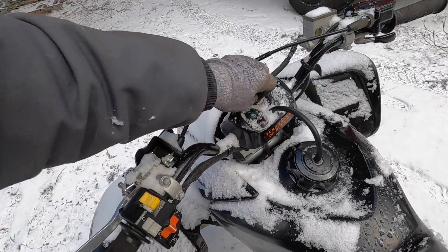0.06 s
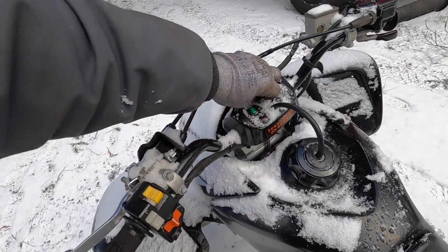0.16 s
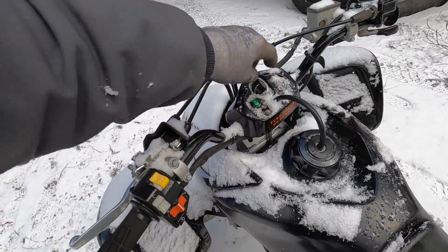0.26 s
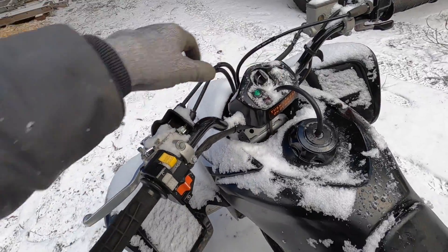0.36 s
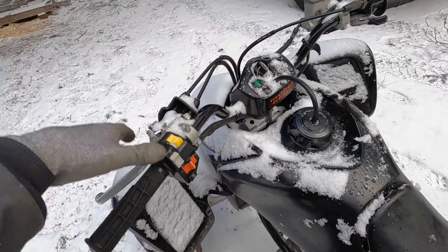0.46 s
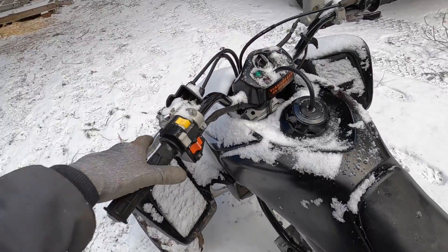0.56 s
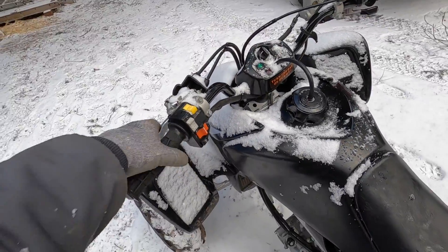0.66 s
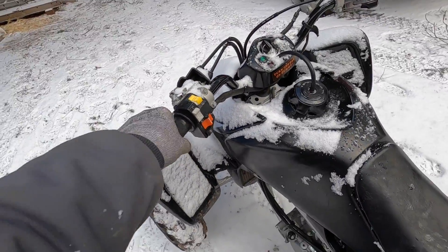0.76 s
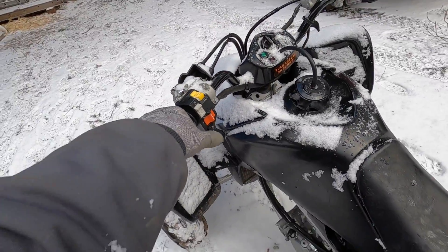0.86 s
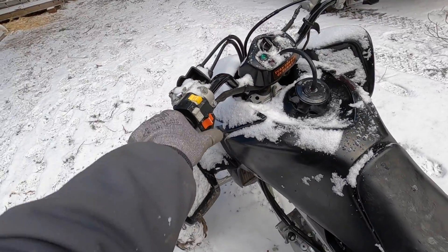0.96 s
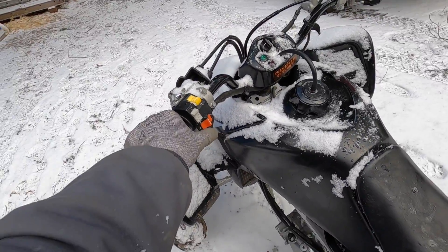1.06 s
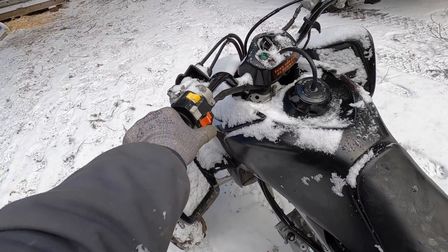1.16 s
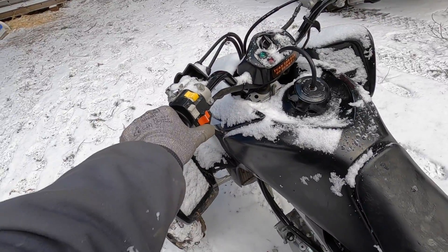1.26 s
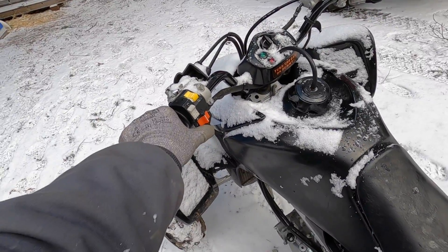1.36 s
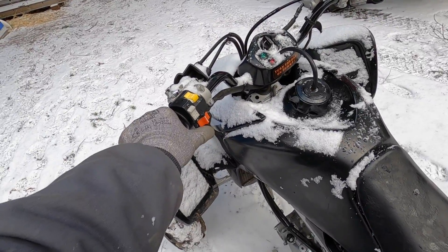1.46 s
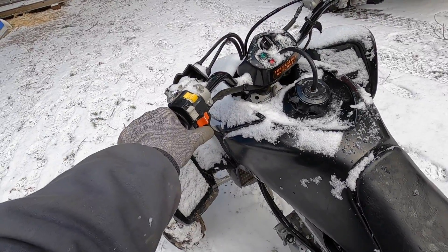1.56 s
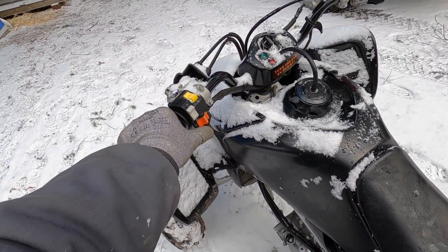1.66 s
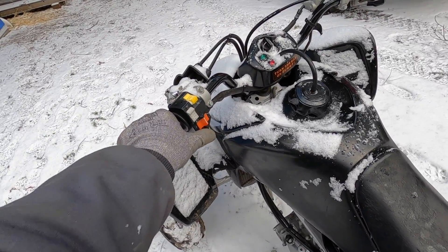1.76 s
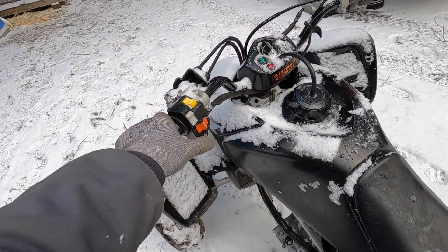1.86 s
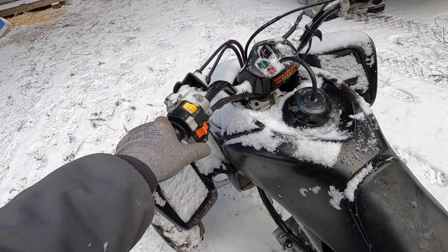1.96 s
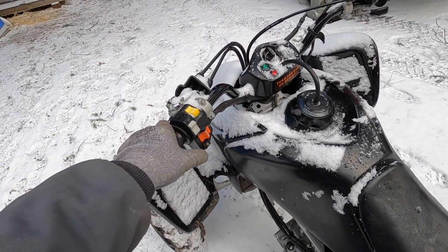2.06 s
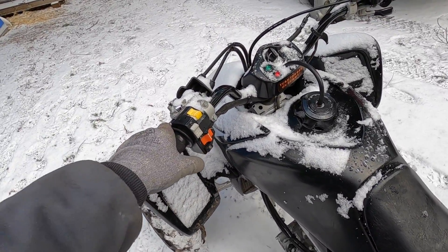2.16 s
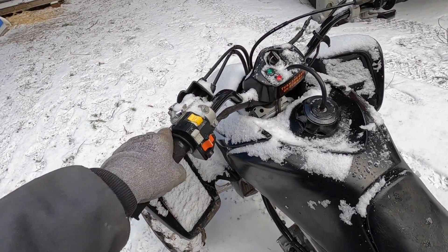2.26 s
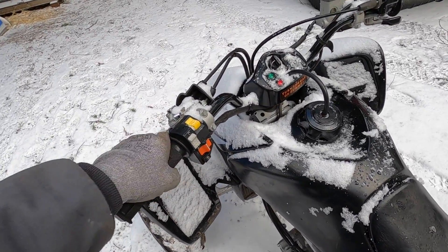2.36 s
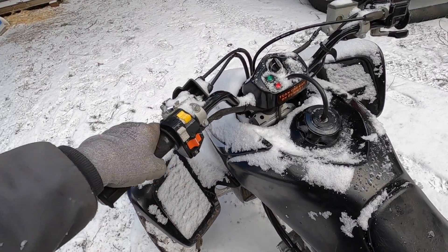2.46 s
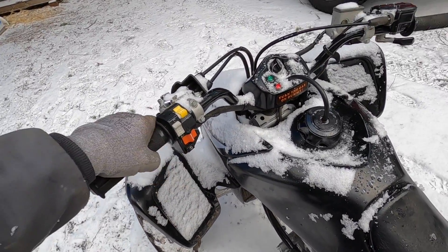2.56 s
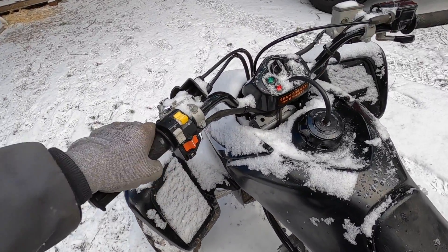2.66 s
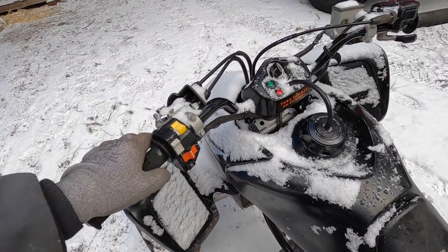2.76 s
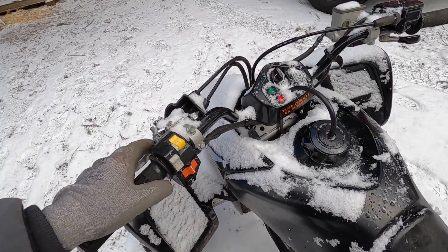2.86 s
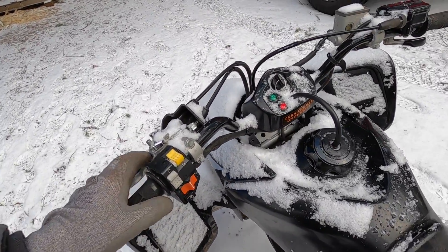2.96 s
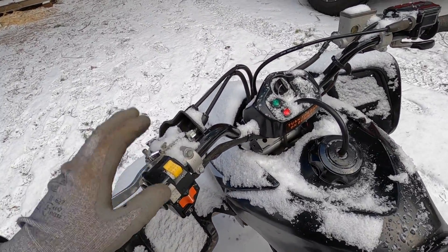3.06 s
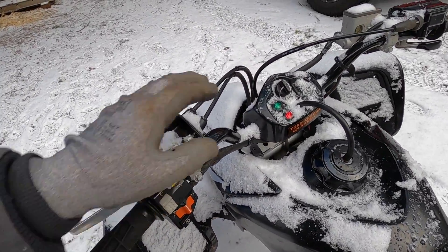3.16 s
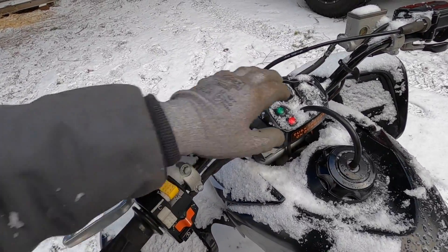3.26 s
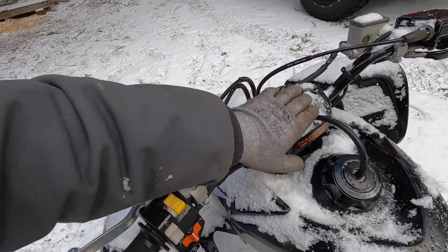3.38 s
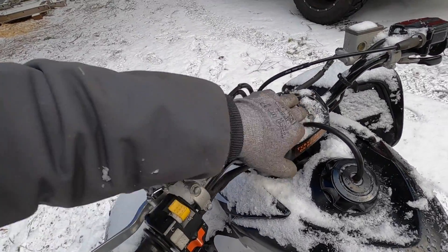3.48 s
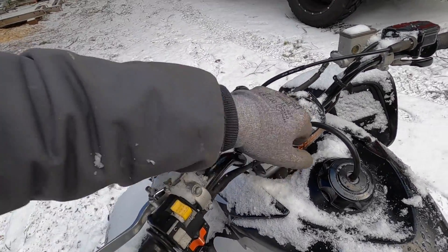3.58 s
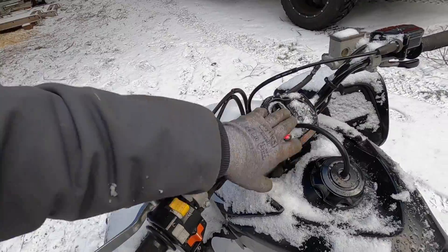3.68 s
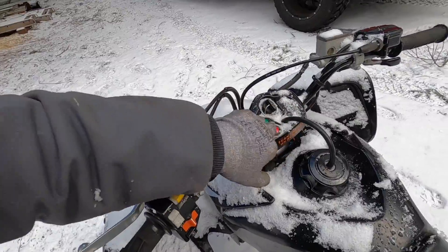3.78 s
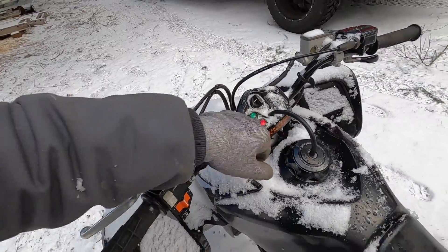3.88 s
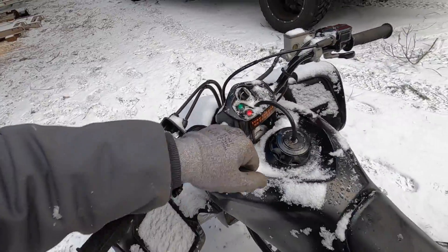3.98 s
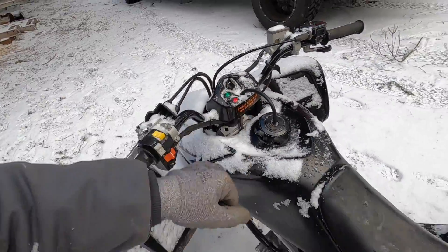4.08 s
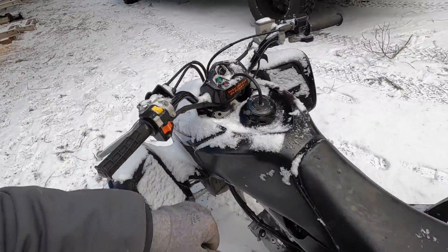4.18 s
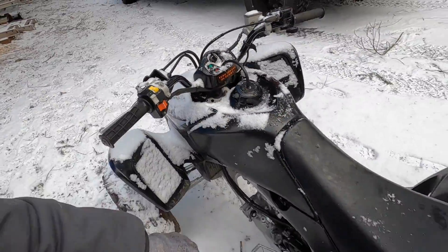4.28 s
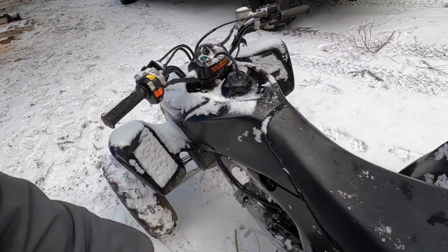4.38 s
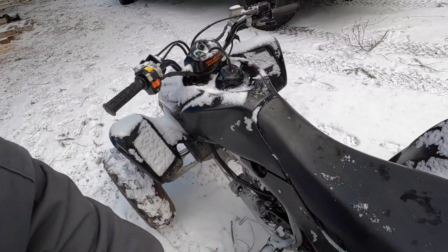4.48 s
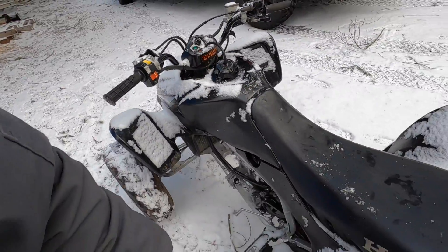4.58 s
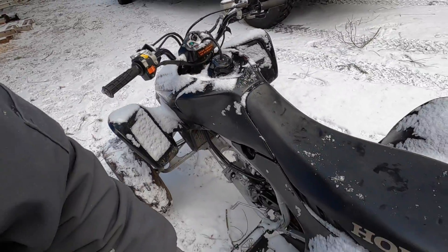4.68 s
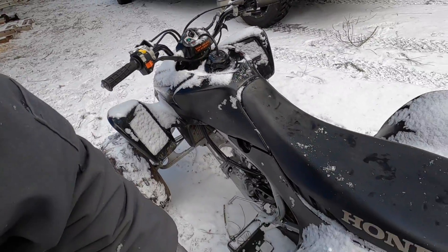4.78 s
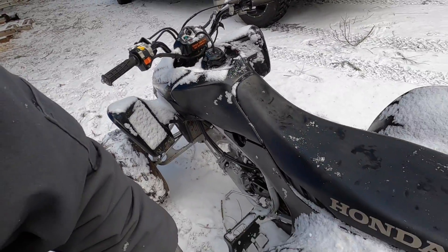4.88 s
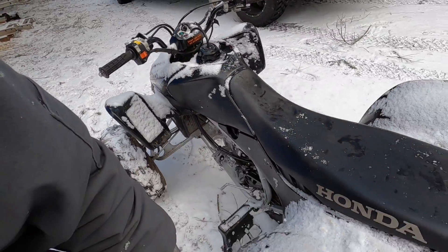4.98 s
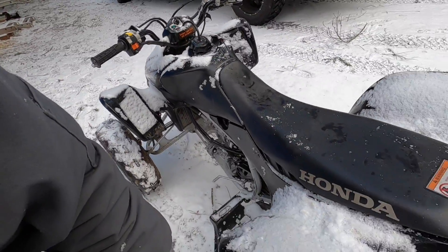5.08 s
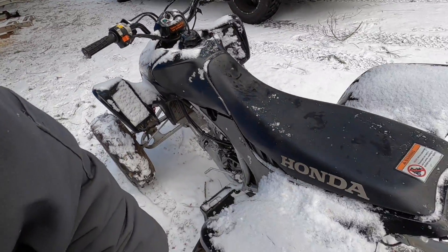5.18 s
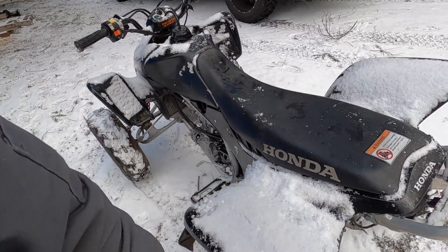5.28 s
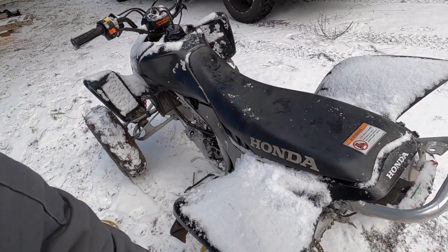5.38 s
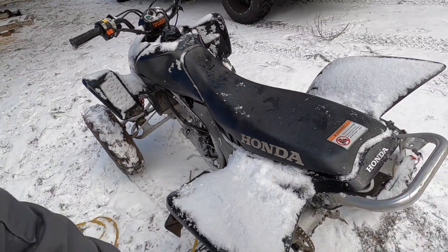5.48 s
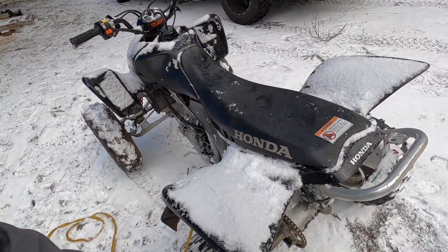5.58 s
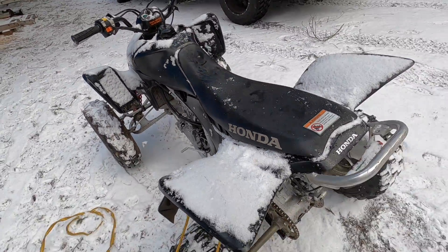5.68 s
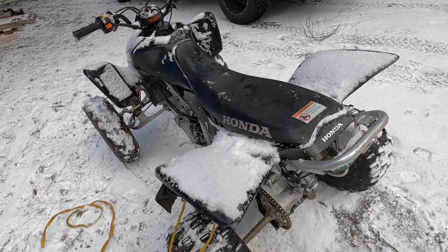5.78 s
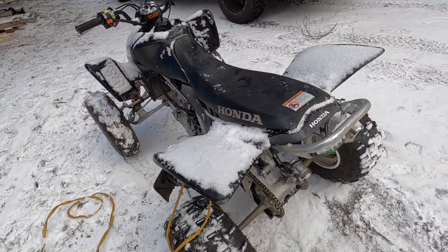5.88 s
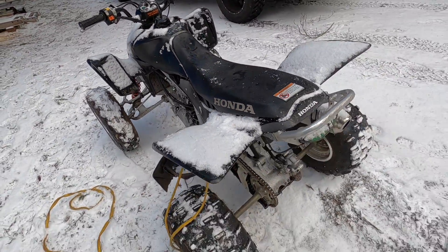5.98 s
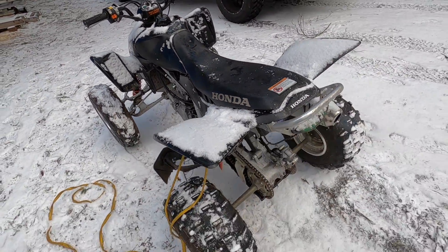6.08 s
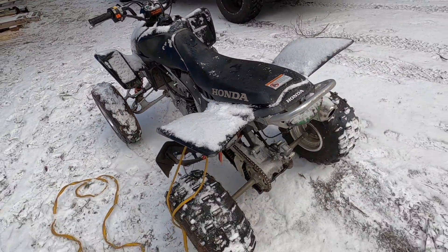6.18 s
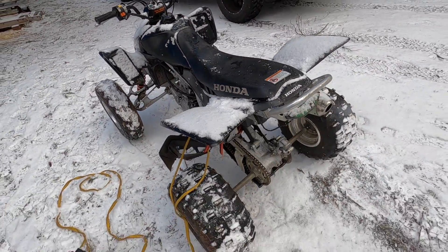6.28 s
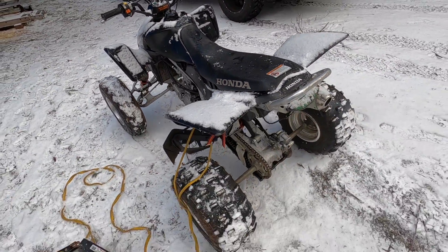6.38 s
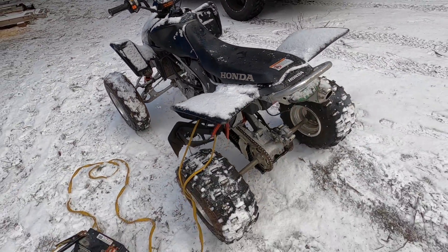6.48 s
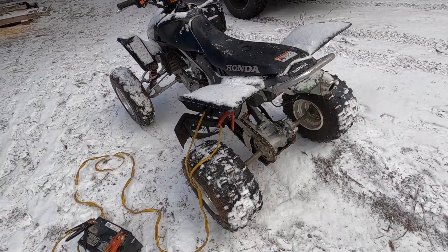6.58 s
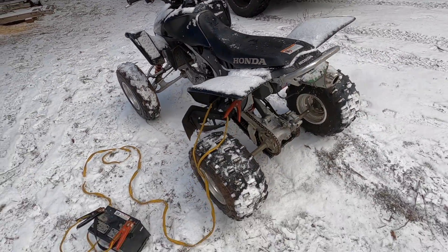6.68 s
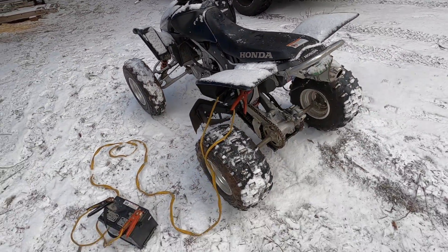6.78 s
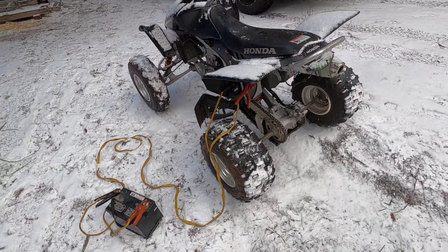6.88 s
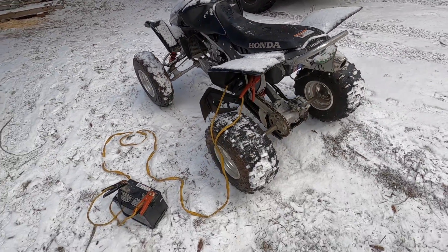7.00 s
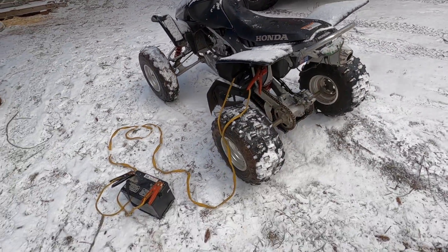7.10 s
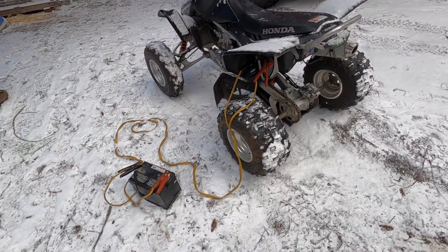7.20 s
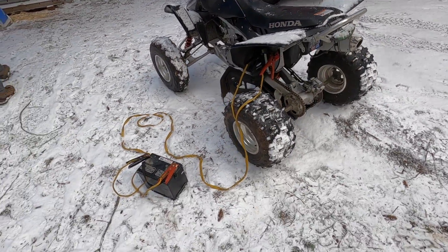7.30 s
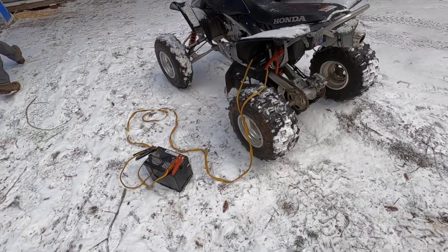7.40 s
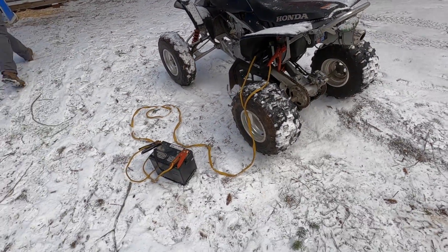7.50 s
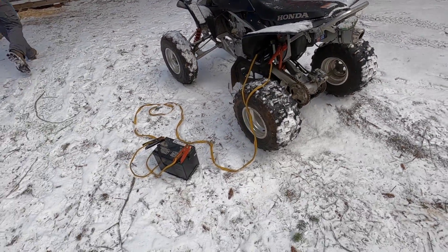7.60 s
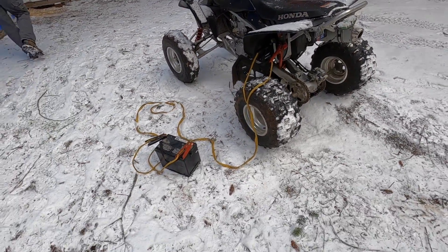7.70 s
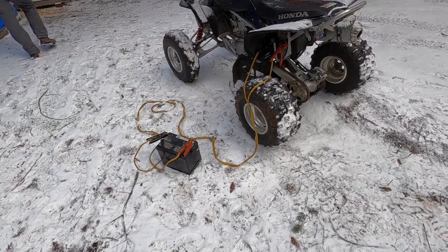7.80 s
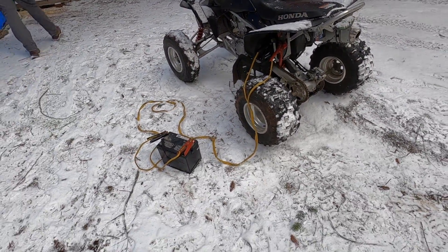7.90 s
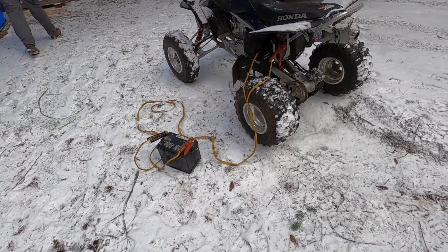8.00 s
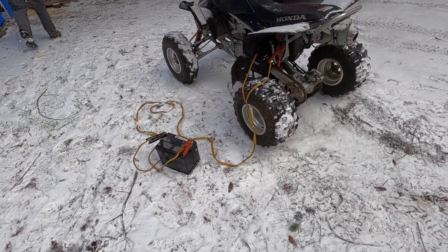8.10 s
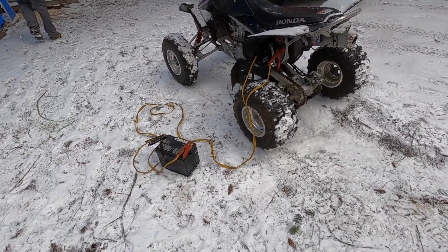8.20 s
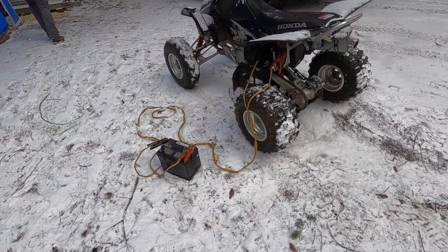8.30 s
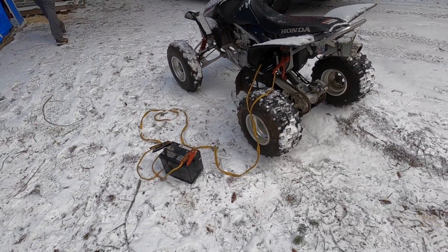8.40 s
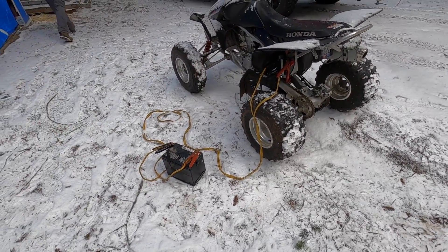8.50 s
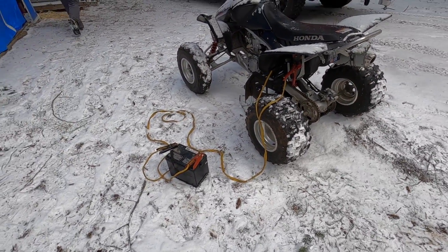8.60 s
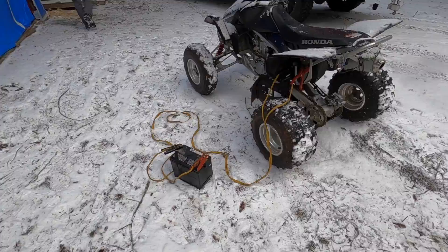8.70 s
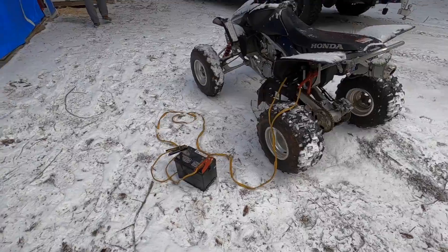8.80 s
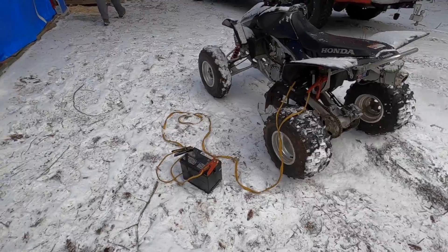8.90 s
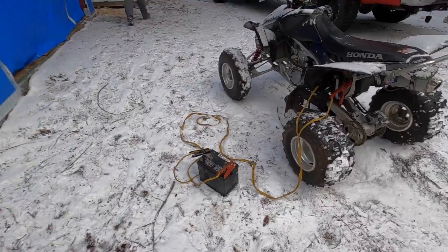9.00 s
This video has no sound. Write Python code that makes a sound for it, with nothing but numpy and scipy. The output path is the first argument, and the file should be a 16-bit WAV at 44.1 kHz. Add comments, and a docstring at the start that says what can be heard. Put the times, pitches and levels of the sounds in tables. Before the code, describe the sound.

Outdoors, heard from the rider's chest beside a quad bike, over a faint low air rumble. A firm switch snap comes at about 0.25 seconds, with much softer clicks around it and at 0.65 and 0.8, the last with a light handlebar bump. At 1.1 the starter winds up briefly, then from 1.2 grinds harshly, gears whining downward under load. Uneven, dull firings cough at 1.4 to 1.65; a thin starter whistle and metallic ticks die away as the engine catches near 1.7. It climbs from about 16 to 24 pulses a second by 3.6, boomy and honking, with piston slap and valve clatter. From about 4 the listener walks rearward: airbox tone fades, exhaust overtones, cracks, gas rush and hiss come forward, and the bike shifts slightly right. The steady fast idle creeps up to nearly 28 pulses a second and continues to the end at 9.

```python
"""Outdoors in the snow, a single-cylinder quad bike is started, heard from the rider's chest.
Switches click, then the starter's gear teeth hammer their casing and its gears whine in gliding tones.
The engine catches and speeds up to a fast idle: each firing rings exhaust and airbox resonances,
while shaped noise makes the gas rush, piston slap and valve clatter.
The rider then walks from the handlebars round to the back, where the exhaust barks more."""
import sys
import numpy as np
from scipy import signal
from scipy.fft import rfft, irfft, next_fast_len
from scipy.io import wavfile
from scipy.ndimage import uniform_filter1d, map_coordinates

SR = 44100
rng = np.random.default_rng(int(sys.argv[2]) if len(sys.argv) > 2 else 0)


def dump(signal):
    """Clip the signal to [-1, 1] and save it as 16-bit WAV at the path in sys.argv[1]."""
    limited = np.clip(np.atleast_2d(signal).T, -1, 1)
    pcm = np.round(limited * 32767).astype(np.int16)
    wavfile.write(sys.argv[1], SR, pcm)


N = 399105
T = np.arange(N) / SR

# engine speed: (time [s], rate [firings/s])
ENGINE_SPEED = [(1.725, 15.581), (2.15, 20.161), (2.35, 19.95), (2.67, 22.266), (3.63, 24.263),
                (4.19, 23.795), (4.35, 25.302), (4.55, 24.639), (4.71, 25.582), (5.35, 25.117),
                (6.23, 26.035), (6.55, 25.825), (6.95, 26.399), (7.15, 25.889), (7.39, 26.496),
                (7.95, 26.306), (9.05, 27.682)]
RUN_FROM_S = ENGINE_SPEED[0][0]
# the first, uneven firings: (time [s], level relative to a regular firing [dB])
FIRST_FIRINGS = [(1.402, 0), (1.4178, -0.5), (1.560, 1), (1.655, 3.5)]


def from_db(db):
    """Turns decibels into an amplitude factor."""
    return 10 ** (np.asarray(db) / 20)


def rms_one(x):
    """Scales a signal to an rms of 1."""
    return x / np.sqrt(np.mean(x ** 2) + 1e-20)


def at(rows, times):
    """Reads the columns of a curve at the given times."""
    s, *columns = np.transpose(rows)
    return [np.interp(times, s, column) for column in columns]


def add(out, start_s, sound):
    """Mixes a short sound in."""
    i = int(np.clip(round(start_s * SR), 0, N))
    out[i:i + len(sound)] += sound[:N - i]


def ring_bank(force, modes, second_width):
    """Rings a row of modes, each through two resonators in series; rms 1."""
    total = 0
    for hz, width, db in modes:
        once = resonate(force, hz, width)
        total = total + from_db(db) * resonate(once, hz, second_width(hz, width))
    return rms_one(total)


def coloured(x, spectrum):
    """Gives a signal a smooth spectrum, rolled off below its lowest point; rms 1."""
    size = next_fast_len(N)
    hz, db = np.transpose(spectrum)
    log_f = np.log(np.fft.rfftfreq(size, 1 / SR) + 1)
    skirt = np.minimum(np.exp(2 * (log_f - np.log(hz[0]))), 1)
    curve = from_db(np.interp(log_f, np.log(hz), db))
    return rms_one(irfft(rfft(x, size) * skirt * curve, size)[:N])


def noise(spectrum, side_db):
    """Stereo noise, mostly common to both ears."""
    mid, side = (coloured(rng.standard_normal(N), spectrum) for _ in range(2))
    return mid + from_db(side_db) * side * np.array([[1], [-1]])


def resonate(x, hz, width_hz):
    """A band resonance with gain 1 on top."""
    r = np.exp(-np.pi * width_hz / SR)
    feed = np.array([1, 0, -1]) * (1 - r * r) / 2
    return signal.lfilter(feed, [1, -2 * r * np.cos(2 * np.pi * hz / SR), r * r], x)


def swell(ms, hz, swell_ms, steepness=1.43):
    """An air column that builds up to height 1 and rings out."""
    u = np.maximum(ms, 0) / swell_ms
    return -(u * np.exp(1 - u)) ** steepness * np.cos(2 * np.pi * hz * ms / 1000)


def strokes(times, lag_s, width_s, uneven_db):
    """A soft burst at a fixed lag from every firing, with uneven levels."""
    out, t = np.zeros(N), T[:SR // 20] - 1 / 40
    for s, chance in zip(times, rng.standard_normal(len(times))):
        burst = np.exp(-.5 * (t / width_s) ** 2)
        add(out, s + lag_s + t[0], from_db(uneven_db * chance) * burst)
    return out


def walked_m(times):
    """How far the rider has come from the handlebars, at a steady pace."""
    from_s, m_per_s = 3.945, 0.75
    return m_per_s * np.maximum(times - from_s, 0)


def behind(times, within_m):
    """0 at the handlebars, nearing 1 once the rider has walked past the given distance."""
    return 1 - np.exp(-walked_m(times) / within_m)


def open_air():
    """The low rumble of the open air, as steady shaped noise."""
    # spectrum of the rumble: (frequency [Hz], relative density [dB/Hz])
    rumble = [(12, -31.5), (20, 1.5), (49, 1.5), (74, 6.5), (94, -8), (118, -14), (189, -18.5),
              (235, -19.5), (398, -28), (1020, -28.5), (3180, -49.5), (5240, -54), (7930, -52.5),
              (8860, -63.5), (15000, -81)]
    return from_db(-33) * noise(rumble, side_db=-42.0)


def switches(snap_s=0.0033, slide_s=0.012, slide_db=-19, ring_db=-35):
    """A detent slides, snaps home and leaves the handlebar ringing; later a hand bumps the bar."""
    # key and switches: (time [s], relative level [dB], brightest frequency [Hz])
    clicks = [(.109, -52, 4000), (0.2405, -5.5, 1970), (0.359, -32, 1050), (0.653, -42.5, 2660),
              (.8215, -31, 5260)]
    # handlebar and switch housing: (frequency [Hz], relative level [dB], 60 dB decay time [s])
    housing = [(605, -5, 0.39), (864, 3, 0.27), (1650, 15, 0.045), (2020, -5, .1), (3360, -1, .08),
               (3980, -9, .08), (4660, -2, .05), (6760, 0, 0.2), (9981, -8, .044)]
    # a hand bumps the handlebar: (time [s], level [dB], frequency [Hz], swell [ms])
    bump = (.82, -37, 307, 9)
    out, lead = np.zeros(N), SR // 20
    t = T[:SR // 3] - T[lead]
    after = np.maximum(t, 0)
    band = signal.butter(2, [550, 9000], "band", fs=SR, output="sos")
    for s, db, hz in clicks:
        slide = from_db(slide_db) * np.exp(-abs(t - .003) / slide_s)
        force = (t >= 0) * np.exp(-after / snap_s) + slide
        snap = resonate(force * rng.standard_normal(len(t)), hz, hz * 0.92)
        snap = signal.sosfilt(band, snap)
        ring = 0
        for f, level, t60 in housing:
            fade_db = level + ring_db - 60 * after / t60
            ring = ring + from_db(fade_db) * np.sin(2 * np.pi * f * after)
        add(out, s - T[lead], from_db(db) * (4.44 * snap / np.linalg.norm(snap) + 0.53 * ring))
    s, db, hz, swell_ms = bump
    add(out, s, from_db(db) * swell(T[:SR // 10] * 1000, hz, swell_ms))
    return out


def tone(rows, overtone_db, rough):
    """A gliding gear tone with its octave, its level fluttering."""
    hz, db = at(rows, T)
    phase = 2 * np.pi * np.cumsum(hz) / SR
    flutter = 1 + rough * rms_one(uniform_filter1d(rng.standard_normal(N), SR // 200))
    sounding = (T > rows[0][0]) * (T < rows[-1][0])
    wave = np.sin(phase) + from_db(overtone_db) * np.sin(2 * phase)
    return sounding * from_db(db) * flutter * wave


def starter_effort(attack_s=0.0023):
    """How hard the gears grind: bite, growing load, relief, then a long coast."""
    bite_s, bite_db = 1.2226, -26.5
    load_db, load_s = 8.5, 0.082  # grinds louder against compression
    relief_s, relief_fade_s = 1.3695, 0.017  # relieved shortly before the first firing
    coast_from_s, coast_db, coast_db_per_s = 1.507, -31.5, 39
    load = np.clip((T - bite_s) / load_s, 0, 1)
    grip = np.clip((T - bite_s) / attack_s, 0, 1)
    grip = grip * np.exp(-np.maximum(T - relief_s, 0) / relief_fade_s)
    free = np.clip((T - relief_s) / (coast_from_s - relief_s), 0, 1)
    coast = from_db(coast_db - coast_db_per_s * np.maximum(T - coast_from_s, 0))
    return grip * from_db(bite_db + load_db * load) + free * coast


def starter(teeth_per_s=9000):
    """Gear teeth hammer the casing at random while the piston gulps air and the gears whine."""
    # the starter clutch grabs again: (time [s], level [dB], width [s])
    grabs = [(1.5, -16, 0.0067), (1.5454, -17.5, 0.0046), (1.645, -34.5, 0.0078), (1.847, -35.5, 0.0026)]
    # spectrum of the grinding: (frequency [Hz], relative density [dB/Hz])
    grind = [(240, -48), (400, -9.5), (673, -10.5), (784, -14), (846, -11), (1260, -1.5), (1420, -13),
             (1560, -4.5), (3300, -9.5), (4280, -13), (4690, -12.5), (4980, -16), (8250, -31.5),
             (15400, -57)]
    # resonances of the casing: (frequency [Hz], width [Hz], relative level [dB])
    casing_modes = [(1240, 43, 6.5), (1540, 120, -0.5), (2120, 96, -3), (3050, 38, -7), (3250, 56, -7),
                    (3500, 210, -5.5), (5050, 16, -2.5), (6100, 32, -27.5), (8100, 110, -23.5)]
    # air gulps: (time [s], relative level [dB], frequency [Hz], swell [ms])
    gulps = [(1.314, -14, 70, 9), (1.317, -22, 280, 6), (1.343, -16, 80, 9), (1.351, -21, 285, 8),
             (1.502, -20, 170, 7)]
    # the motor winds up before it bites: (time [s], frequency [Hz], level [dB])
    wind_up = [(1.1, 159.5, -62), (1.135, 176, -39), (1.18, 228, -49), (1.205, 245, -66)]
    # gear mesh, dragged down by compression: (time [s], frequency [Hz], level [dB])
    mesh = [(1.22, 1150, -55), (1.28, 1180, -57), (1.315, 1133, -27), (1.345, 973, -43), (1.375, 883, -30),
            (1.40, 810, -73)]
    # the released starter whistles as it spins free: (time [s], frequency [Hz], level [dB])
    whistle = [(1.56, 5100, -79), (1.6, 5530, -60), (1.68, 6200, -56), (1.75, 6400, -55), (1.83, 6380, -62),
               (1.87, 6500, -80)]
    # the starter runs down: (time [s], frequency [Hz], level [dB])
    run_down = [(1.86, 5600, -88), (1.888, 5240, -49), (1.93, 4850, -57), (2.0, 4300, -75)]
    level = starter_effort()
    for s, db, width in grabs:
        level = level + from_db(db) * np.exp(-.5 * ((T - s) / width) ** 2)
    teeth = rms_one((rng.random(N) < teeth_per_s / SR) * rng.choice([-1, 1], N))
    casing = rms_one(sum(from_db(db) * resonate(teeth, hz, width) for hz, width, db in casing_modes))
    out = level * (from_db(-2.0) * coloured(teeth, grind) + from_db(-11) * casing)
    for s, db, hz, swell_ms in gulps:
        add(out, s, from_db(db + 5.0) * swell(T[:SR // 10] * 1000, hz, swell_ms))
    out += tone(wind_up, overtone_db=3.5, rough=0.12)
    out += tone(mesh, overtone_db=10.0, rough=0.23)
    out += tone(whistle, overtone_db=-34, rough=.25)
    return out + tone(run_down, overtone_db=-35, rough=.5)


def firing_times():
    """The first uneven firings, then one each time the four-stroke cycle comes round."""
    t = T[T >= RUN_FROM_S]
    cycles = np.cumsum(at(ENGINE_SPEED, t)[0]) / SR
    regular = np.interp(np.arange(int(cycles[-1]) + 1), cycles, t)
    return np.r_[[s for s, db in FIRST_FIRINGS], regular]


def clatter_level():
    """The metal clatters most while still dry of oil, and a little more from behind; dB."""
    dry_db, oiled_s = 6, 0.15
    dryness = np.exp(-np.maximum(T - RUN_FROM_S, 0) / oiled_s)
    return -44.5 + dry_db * dryness + 3.5 * behind(T, within_m=2.9)


def piston_slap(times):
    """As the piston rocks over at the top of its stroke it slaps the cylinder wall."""
    # the slap's resonances: (frequency [Hz], width [Hz], relative level [dB])
    slap_modes = [(1175, 370, 3.5), (2032, 170, 0.5), (2830, 270, -12.5)]
    force = strokes(times, lag_s=-0.0042, width_s=0.004, uneven_db=0.0) * rng.standard_normal(N)
    ring = ring_bank(force, slap_modes, lambda hz, width: width)
    # loudest over the engine
    return from_db(clatter_level()) * (1 - 0.61 * behind(T, within_m=0.57)) * ring


def puffs(times, modes, level_db, uneven_db, detune, sharper=0):
    """Each pulse rings the modes, and again after a round trip; no two burn quite alike."""
    # the pitch rises as the gas warms, dips slightly around the start of the walk,
    # then recovers a little: (time [s], share of the full pitch [ratio])
    pitch_share = [(1.4, .8), (1.66, .85), (1.9, 0.9), (3.3, 1.0), (5, 0.968), (9.05, 0.99)]
    level_rate = 25  # firings/s at which level_db holds
    chance = rng.standard_normal((len(times), 2, len(modes)))
    # a higher pitch runs the whole ring faster, lags included
    pace = (at(pitch_share, times)[0] + sharper)[:, None]
    ms = np.arange(SR // 14) * 1000 / SR * pace
    shape = 0
    for k, (hz, swell_ms, lag_ms, trip_ms, echo_db, db) in enumerate(modes):
        pitch = hz * (1 + detune * chance[:, 0, k, None])
        ring = swell(ms - lag_ms, pitch, swell_ms)
        ring = ring + from_db(echo_db) * swell(ms - lag_ms - trip_ms, pitch, swell_ms)
        shape = shape + ring * from_db(db + uneven_db * chance[:, 1, k, None])
    power = np.mean(np.sum(shape ** 2, axis=1)) * level_rate / SR
    gains = from_db(level_db) / np.sqrt(power)
    gains[:len(FIRST_FIRINGS)] *= from_db([db for s, db in FIRST_FIRINGS])
    out = np.zeros(N)
    for s, gain, puff in zip(times, gains, shape):
        add(out, s, gain * puff)
    return out


def exhaust(times, dull_start_db=-9):
    """The silencer booms lower at the handlebars, higher from behind; pipe and airbox ring along."""
    # resonances, as at full pitch: (frequency [Hz], swell [ms], lag [ms], round trip [ms],
    # echo level [dB], relative level [dB])
    silencer_low = [(95.4, 10, 1.29, 10.5, -4, -5.5), (52, 3.6, 0.67, 7.0, -33.5, -22)]
    silencer_high = [(138.6, 5.97, 0.57, 7, -9, 6), (64, 4.5, 0.19, 2.3, -20, 0.5)]
    honk = [(286.7, 2.58, 2.487, 6.51, -4, 1), (237, 5.66, 1.31, 8.7, -14, -11)]
    # the airbox under the tank, same columns
    airbox = [(535, 4.2, 1.0, 3.5, -5, -2), (874, 2.2, 1.35, 3.5, -1, -5.5)]
    # level of the honk: (time [s], level [dB])
    honk_level = [(1.75, -14.5), (2.2, -14.5), (3.8, -13), (4.6, -14.5), (5.7, -17), (6.3, -15),
                  (7.2, -16.5), (8.9, -20.5)]
    # pipe overtones; each beams its own way, so the walk crosses one loud or dead spot:
    # (frequency [Hz], swell [ms], lag [ms], round trip [ms], echo level [dB], level at the
    # handlebars [dB], level behind [dB], spot [m], spot width [m], spot boost [dB])
    overtones = [(162.6, 7.1, 1.3, 7, -2.5, -41.5, -33, 1.3, 0.41, 10.5),
                 (342, 4.3, 2.22, 6.19, -1.5, -30, -36.5, 4.4, 0.38, 4.5),
                 (432.4, 6.15, 1.984, 6.036, -2, -30, -21.5, 2.3, 0.74, -10),
                 (595.3, 2.3, 1.26, 6.45, -1, -49, -35.5, 2.28, 1.1, 9),
                 (765.4, 2.13, 1.162, 6.55, 0, -47.5, -28, 1, 0.32, -7),
                 (919.5, 2.5, 1.088, 6.46, 1, -53, -40, 1.97, 0.47, 9.5),
                 (1046, 2.07, 1.26, 7.4, 0, -48.5, -38.5, 3.65, 0.55, -9),
                 (1212, 2.9, 1.3, 5.9, -4.5, -49, -47.5, 3.5, 1.3, 7),
                 (1580, 2.5, 1.3, 7.6, -5, -59.5, -51.5, 3.0, 1.2, 7.5)]
    # the silencer comes clear within the first step
    clear = behind(times, within_m=0.39)
    high_share = np.clip(0.14 + 0.51 * behind(times, within_m=1.0), .03, .97)
    boom_db = -17 + 0.5 * behind(times, within_m=1.8)
    # the first firings sound duller, with less low boom, airbox and pipe overtones
    dull_db = np.where(times < RUN_FROM_S, dull_start_db, 0)
    low_db = boom_db + dull_db / 2 + 10 * np.log10(1 - high_share)
    out = puffs(times, silencer_low, low_db, uneven_db=0.25, detune=0.0074)
    high_db = boom_db + 10 * np.log10(high_share)
    out += puffs(times, silencer_high, high_db, uneven_db=0.53, detune=0.0024)
    # from well behind the bike the honk sounds a little higher
    rise = .04 * np.maximum(walked_m(times) - 2.07, 0)
    out += puffs(times, honk, at(honk_level, times)[0], uneven_db=0.4, detune=0.015, sharper=rise)
    # the airbox gulps harder while the engine pulls up to speed, and fades on the walk
    pull_db = 5.5 * np.exp(-np.maximum(times - RUN_FROM_S, 0) / 0.56)
    airbox_db = -33.5 + pull_db + dull_db - 20 * clear
    out += puffs(times, airbox, airbox_db, uneven_db=1.0, detune=.008)
    # the overtones' levels behind hold at mid-walk and fade with distance
    mid_walk_m, fade_db_per_m = 1.58, 1.0
    far_db = fade_db_per_m * (walked_m(times) - mid_walk_m)
    for *mode, front_db, rear_db, spot_m, width_m, spot_db in overtones:
        spot = np.exp(-((walked_m(times) - spot_m) / width_m) ** 2)
        level_db = front_db + (rear_db - far_db - front_db) * clear + spot_db * spot
        out += puffs(times, [(*mode, 0)], level_db + dull_db, uneven_db=0.3, detune=0.002)
    return out


def engine_noise(times, rattles_per_s=1500):
    """Gas rushes out with each pulse; the piston knocks just before it, the valves tick in between."""
    # gas rush spectrum: (frequency [Hz], relative density [dB/Hz])
    rush_spectrum = [(60, -10), (130, -6), (330, -0.5), (520, 6), (900, -6.5), (1300, -9), (2000, -22.5),
                     (4000, -44)]
    # valve gear and piston slap spectrum: (frequency [Hz], relative density [dB/Hz])
    clatter_spectrum = [(500, -7.5), (1000, 7), (2100, -2.5), (2600, -2.5), (3300, -5.5), (4500, -11),
                        (5600, -18.5), (7600, -24), (9000, -40), (12000, -42), (16000, -52)]
    # cylinder and cases ring under the knock: (frequency [Hz], width [Hz], relative level [dB])
    cylinder = [(1190, 92, -7), (1827, 170, 3), (2010, 39, -1.5), (2213, 13, -3), (3130, 17, -4),
                (3700, 28, -4.5), (4690, 17, -11)]
    rear = behind(T, within_m=0.31)
    running = np.clip((T - times[0]) / 0.66, 0, 1)
    gas = rms_one(0.095 + strokes(times, lag_s=0.0095, width_s=0.012, uneven_db=-0.8))
    knock = strokes(times, lag_s=0.0006, width_s=0.0046, uneven_db=1.0) * (1.05 - 0.72 * rear)
    blow = 0.95 * strokes(times, lag_s=0.0069, width_s=.005, uneven_db=1.5) * rear
    valves = 0.63 * strokes(times, lag_s=.0245, width_s=0.0015, uneven_db=5.5)
    metal = rms_one(1.0 + knock + blow + valves)
    rattle = metal * (rng.random(N) < rattles_per_s / SR) * rng.choice([-1, 1], N)
    ringing = ring_bank(rattle, cylinder, lambda hz, width: hz / 2)
    rush_db = -44 + 8 * behind(T, within_m=0.72)
    rush = from_db(rush_db) * gas * noise(rush_spectrum, side_db=-11.5)
    clatter = from_db(-0.25) * metal * noise(clatter_spectrum, side_db=-22.5)
    clatter = clatter + from_db(-10.0) * ringing
    return running * (rush + from_db(clatter_level()) * clatter)


def clutch_ticks(times):
    """The freed starter clutch catches lightly on each firing, and the ticks die away."""
    # what the ticks ring with: (frequency [Hz], width [Hz], relative level [dB])
    clutch = [(2930, 87, 2), (4670, 63, -1), (5250, 60, -5.5)]
    from_s, start_db, fall_db_per_s = 1.6, -52, 16.5
    force = strokes(times, lag_s=-.002, width_s=.0015, uneven_db=4.0) * rng.standard_normal(N)
    ring = ring_bank(force, clutch, lambda hz, width: hz / 4)
    level_db = start_db - fall_db_per_s * np.maximum(T - from_s, 0)
    return (T > from_s) * from_db(level_db) * ring


def tailpipe(times):
    """The open pipe cracks and hisses with every pulse, growing as the rider walks behind."""
    # front of the pulse leaving the pipe, as at full pitch: (frequency [Hz], swell [ms],
    # lag [ms], round trip [ms], echo level [dB], relative level [dB])
    pulse_front = [(680, 0.59, 0.44, 6.5, -18.5, 0)]
    # gas hissing out: (frequency [Hz], relative density [dB/Hz])
    hiss = [(3000, -15.5), (5500, -4), (7600, -2.5), (9000, -16.5), (14000, -43)]
    crack_db = -39.5 - 22 * (1 - behind(times, within_m=1.0))
    crack = puffs(times, pulse_front, crack_db, uneven_db=3.0, detune=0.011)
    gate = rms_one(.7 + strokes(times, lag_s=.006, width_s=.006, uneven_db=0.5))
    return crack + from_db(-60) * behind(T, within_m=1.3) * gate * noise(hiss, side_db=-16)


def scene(shade_per_m=0.081):
    """The bike close by, over the low rumble of the open air."""
    times = firing_times()
    # from behind the tailpipe is nearer, so each pulse comes up to 1.4 ms sooner
    times = times - .0014 * behind(times, within_m=.9)
    bike = switches() + starter() + piston_slap(times) + exhaust(times)
    left, right = bike + engine_noise(times) + clutch_ticks(times) + tailpipe(times)
    # walking back puts the bike a little to the right: the left ear hears it later and slightly shaded
    lag_samples = 2.2 * behind(T, within_m=.9)
    left = map_coordinates(left, [np.arange(N) - lag_samples], order=3)
    shade = shade_per_m * walked_m(T) * resonate(left, 430, 800)
    return np.array([left - shade, right]) + open_air()


def record(dry, top=1.15, low_cut_hz=38, cutoff_hz=16200):
    """The deepest bass rolls off, peaks are slightly rounded, the top is cut."""
    heard = signal.sosfilt(signal.butter(2, low_cut_hz, "high", fs=SR, output="sos"), dry)
    rounded = top * np.tanh(heard / top)
    return signal.sosfilt(signal.cheby2(12, 70, cutoff_hz, fs=SR, output="sos"), rounded)


dry = scene()
out = record(dry)
dump(out)
```